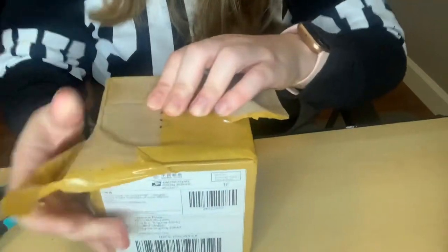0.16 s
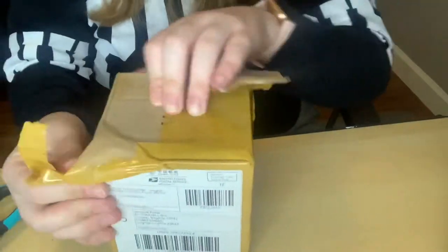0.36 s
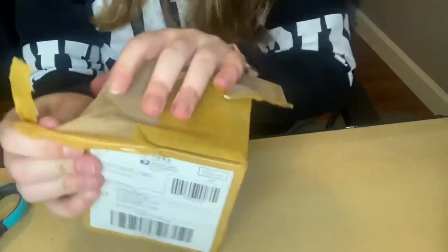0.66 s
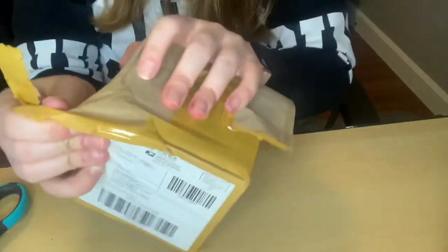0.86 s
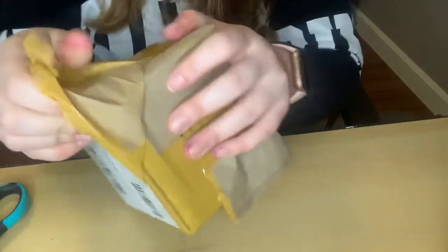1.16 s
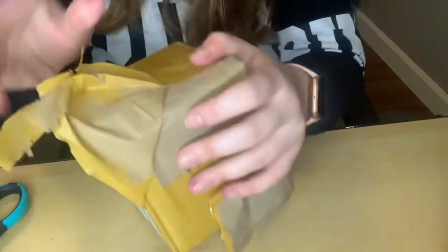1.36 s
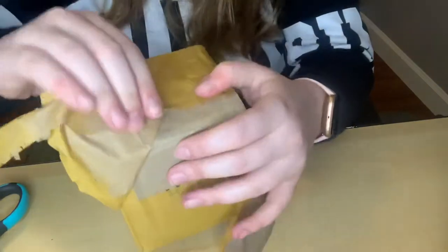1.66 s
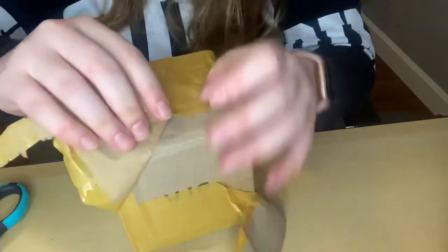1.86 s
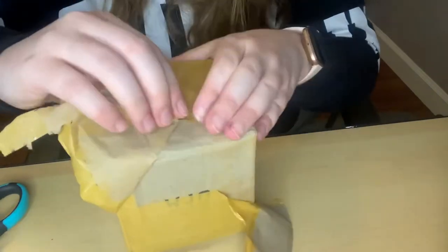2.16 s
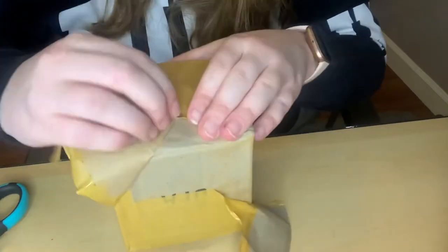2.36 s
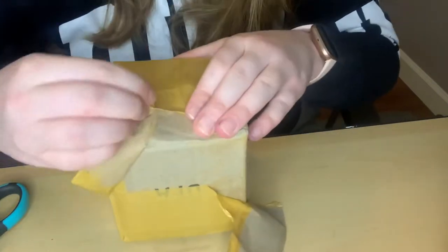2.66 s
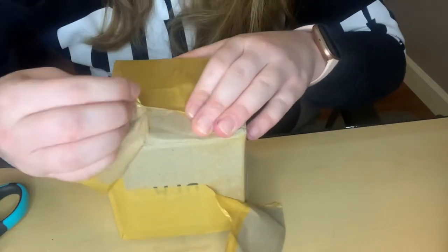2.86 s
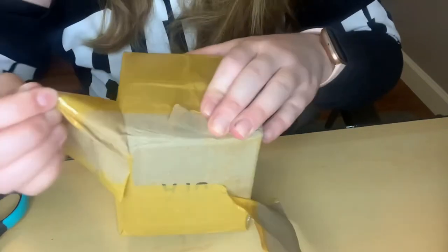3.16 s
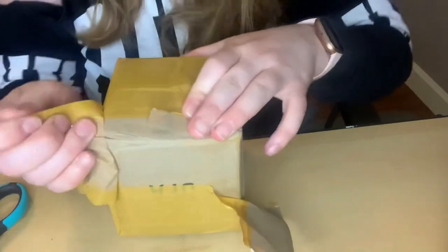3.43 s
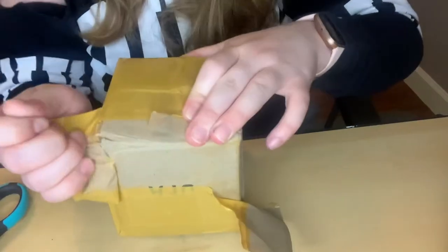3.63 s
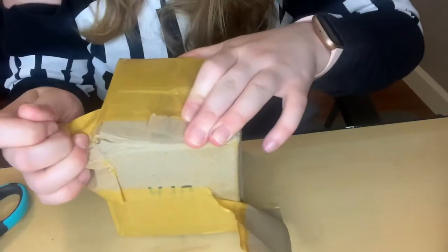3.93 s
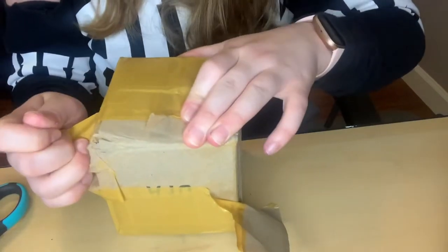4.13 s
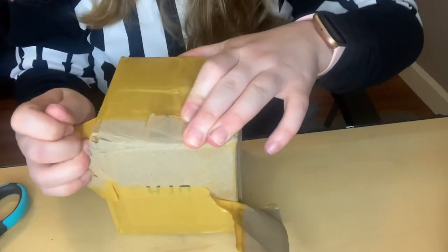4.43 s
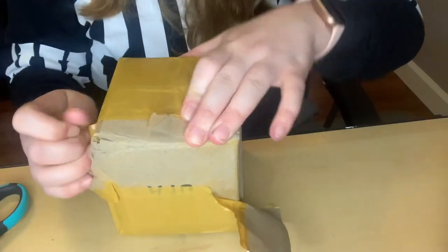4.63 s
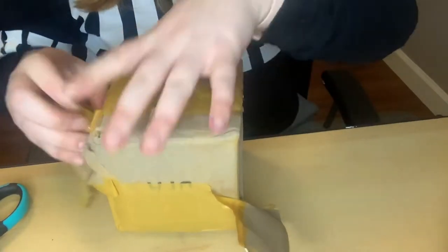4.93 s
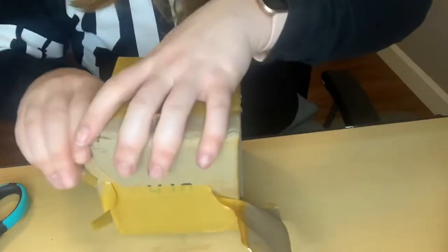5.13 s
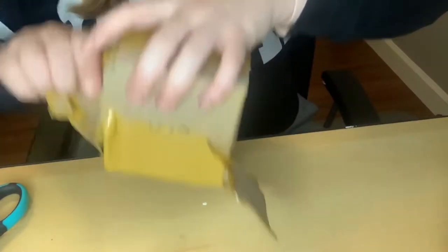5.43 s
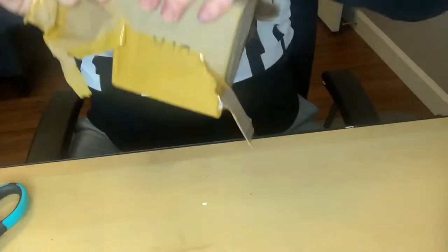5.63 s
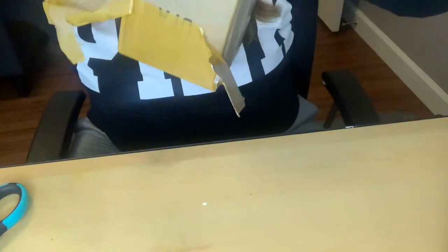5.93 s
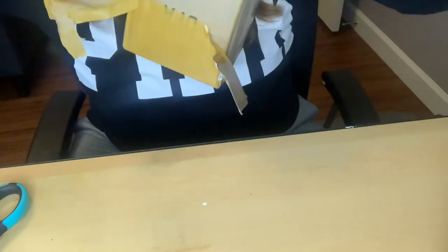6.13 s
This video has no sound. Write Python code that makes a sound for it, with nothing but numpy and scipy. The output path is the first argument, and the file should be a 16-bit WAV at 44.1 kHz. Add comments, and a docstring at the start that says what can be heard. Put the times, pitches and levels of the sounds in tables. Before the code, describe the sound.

A small cardboard parcel is unwrapped on a desk, close to a stereo microphone in a quiet little room. From the start, brown paper crinkles unevenly with crisp snaps and short rips of packing tape, while the box rubs and bumps dully on the desk. The hands pause briefly around 1.4 seconds. From about 2.3 seconds the box is pressed down and tape is picked at, peeling with a thin hiss and small cracks. At 2.9 seconds a hard yank rips and twangs the strip with a thud. A cluster of rips and snaps comes at 3.6 seconds, and a loud snap with a bump at 4.2. Lighter crackling, peeling and nudges continue. After 5.6 seconds the box is lifted away and knocks hollowly with loud, sharp cracks at about 5.7, 5.95 and 6.2 seconds, with a little more room sound.

```python
"""A small cardboard parcel is unwrapped on a desk in a small room, close to a stereo microphone.
From the start the brown paper crinkles as hard as the hands work; packing tape rips in short runs and
the taut wrapping snaps and buckles (bending waves: treble first, bass later) while the box is shoved
and bumps the desk. Midway a hand presses the box down to pick at the tape, then a yank twangs the strip.
Near the end the box is lifted away and knocks hollowly, and more of the room reaches the microphone."""
import sys
import numpy as np
from scipy import signal
from scipy.fft import rfft, irfft
from scipy.io import wavfile
from scipy.ndimage import uniform_filter1d

SR = 44100
rng = np.random.default_rng(int(sys.argv[2]) if len(sys.argv) > 2 else 0)


def file_out(sig):
    """Save sig as 16-bit WAV at sys.argv[1]."""
    # one column per channel
    cols = np.atleast_2d(sig).T
    # limit, then scale
    lim = np.clip(cols, -1, 1)
    pcm = np.round(lim * 32767).astype(np.int16)
    wavfile.write(sys.argv[1], SR, pcm)


N = 277389
TIME = np.arange(N) / SR

# How hard the hands work the wrapping. Each row: time in seconds, effort in dB.
EFFORT = [(0.0, -36.5), (0.4, -39), (0.77, -48.5), (1.14, -39), (1.33, -69), (1.54, -33), (1.7, -48.5),
          (2.08, -65.5), (2.26, -50), (2.42, -46), (3.12, -40.5), (3.65, -50), (3.82, -53.5), (3.96, -40.5),
          (4.17, -35.5), (4.61, -37), (4.77, -40), (4.97, -62), (5.2, -41.5), (5.34, -52), (5.69, -37),
          (5.99, -30), (6.17, -38), (6.29, -45)]
# The hands pause. Each row: start and end in seconds, share of their movement that stops.
RESTS = [(1.298, 1.55, 0.84), (3.44, 3.457, 1), (4.463, 4.508, 1), (5.048, 5.15, 0.9), (5.716, 5.912, 0.59),
         (6.0, 6.135, 0.1)]
# The box is shoved or turned. Each row: start and end in seconds, rubbing and rocking levels in dB.
SHOVES = [(0.201, 0.283, -44, -63), (0.357, 0.566, -55, -52), (0.857, 0.878, -50.5, -56),
          (1.214, 1.256, -48.5, -47.5), (1.525, 1.635, -44, -45.5), (1.973, 2.026, -46, -49),
          (2.381, 2.484, -46.5, -66), (2.934, 2.966, -33.5, -35.5), (3.04, 3.242, -55.5, -58),
          (3.343, 3.366, -63, -44), (3.7, 3.78, -68, -56), (4.22, 4.254, -56, -40),
          (4.347, 4.471, -55.5, -75), (4.655, 4.777, -50.5, -65), (4.91, 4.955, -48.5, -42.5),
          (5.05, 5.23, -59.5, -51.5)]
# Tape creeps off the card with a thin hiss. Each row: start and end in seconds, level in dB.
PEELS = [(2.37, 2.64, -40.5), (3.54, 3.59, -36), (4.0, 4.45, -52), (4.63, 4.73, -43)]
# Runs of ripping tape. Each row: start and end in seconds, rasp pitch in Hz, crack level in dB,
# box wall against the crack in dB.
RIPS = [(0.034, 0.079, 4170, -39, -3.5), (0.201, 0.268, 4500, -40.5, -52),
        (1.231, 1.259, 3000, -47.5, -7.5), (2.381, 2.395, 5500, -33.5, -5), (2.44, 2.45, 5500, -38.5, 5.5),
        (2.594, 2.628, 4500, -35.5, -10.5), (2.737, 2.797, 3600, -40.5, -7), (2.914, 2.926, 3300, -40, -29),
        (2.923, 2.983, 940, -33.5, -7.5), (2.95, 2.985, 4900, -31.5, -21), (3.311, 3.318, 2420, -36.5, -7),
        (3.55, 3.616, 2600, -37, -17.5), (3.569, 3.577, 2100, -34, -10), (3.629, 3.688, 2500, -50.5, -17),
        (4.172, 4.202, 4200, -36.5, -13), (4.655, 4.725, 3900, -38.5, -29), (4.871, 4.929, 3300, -42, -8),
        (5.252, 5.328, 5550, -40, -17), (5.686, 5.7, 6500, -43, -21), (5.938, 5.969, 4530, -28, -19),
        (6.171, 6.186, 4800, -31, -18), (6.198, 6.218, 3970, -24, -9)]
# Snaps of tape and paper. Each row: time in seconds, crease pitch in Hz, crack level in dB,
# then box wall and tape film, each against the crack in dB.
SNAPS = [(0.036, 2130, -29, -13, -4), (0.0531, 8400, -31.5, -0.5, 17), (0.221, 5570, -56, 23, 22),
         (0.2699, 1340, -35.5, -2, -2), (0.3116, 3960, -25.5, -28, -0.5), (0.3808, 4480, -38.5, -11, -10),
         (0.4214, 4600, -28, -26, -6), (0.461, 5340, -25.5, -9.5, -1), (0.523, 7350, -31.5, -40, 4),
         (0.565, 4560, -28, -17.5, 0), (0.627, 1050, -56, 6, -12), (0.6489, 5840, -40.5, -4.5, -13),
         (0.6807, 4020, -40, -20, -7), (0.721, 5200, -42, -24, -6), (0.73, 2100, -29, -20, -3.5),
         (0.8027, 1890, -36, -12, -7), (0.847, 1680, -40, -0.5, -4), (0.926, 3880, -37.5, -33, 4),
         (0.9557, 2820, -37.5, -33, -3), (0.981, 3050, -51, 1, 2), (0.9985, 3510, -22.5, -20, -16),
         (1.015, 4200, -46, -17, 2), (1.038, 3500, -54, -18, 0), (1.091, 3900, -44, -24, -6),
         (1.1046, 3830, -24, -26, -3), (1.114, 2320, -37.5, -12.5, -14), (1.154, 5240, -41, -23, 3),
         (1.18, 3270, -44, -9, -9), (1.195, 3320, -43, -5, -1), (1.2482, 2500, -24.5, -17.5, -3.5),
         (1.2494, 1860, -30, -14.5, -9), (1.265, 3550, -33, -15, 4), (1.429, 6400, -48, -30, -10),
         (1.533, 1220, -45.5, -29, -38), (1.566, 3640, -31.5, -30, -6), (1.5766, 3700, -31, -35, -7),
         (1.6564, 1630, -38, -8, 2), (1.7793, 3600, -39, -6.5, -9), (1.8012, 3380, -31, -19, 3),
         (1.837, 1830, -33, -4, -24), (1.87, 5960, -38, -13, 3.5), (1.9593, 1320, -69, 29.5, -3),
         (2.0139, 3930, -30.5, -14, -4.5), (2.017, 3970, -33.5, -10, -12), (2.1714, 2650, -47, -15, -23),
         (2.231, 3700, -23.5, -36, -4.5), (2.2429, 4640, -25.5, -3, 8.5), (2.3616, 6700, -46.5, -13, 19),
         (2.3854, 5860, -31, 6.5, 19), (2.4423, 6700, -31, 6, 18.5), (2.5543, 7100, -46, -27, 19),
         (2.598, 3780, -26, 0.5, 13.5), (2.609, 6240, -24, -1.5, 1.5), (2.7332, 1300, -24, -3, 3.5),
         (2.7714, 3480, -25.5, -21, -8), (2.787, 7400, -29, -23, 11), (2.9239, 3260, -17.5, -11.5, -1.5),
         (3.1074, 1700, -34.5, -16, 1.5), (3.196, 1900, -34, -11.5, 1), (3.209, 2850, -35.5, -6, -8),
         (3.2815, 3900, -36.5, -18, 5), (3.316, 2920, -31, -5.5, -3), (3.331, 1820, -32.5, -7, -5),
         (3.448, 5000, -40.5, -21, 3), (3.477, 6200, -50, -1, 10), (3.5007, 7000, -40, -22, 1),
         (3.5345, 3300, -24.5, -25, -1.5), (3.557, 3000, -27, -18, -12), (3.567, 2970, -18, -14.5, -2.5),
         (3.574, 2950, -24.5, -10.5, -3), (3.598, 2800, -18.5, -24, -18), (3.611, 3300, -29, -18, -19),
         (3.679, 3400, -35.5, -17, -3), (3.664, 3000, -34.5, -18, -3), (3.773, 1090, -47.5, -9, 2),
         (3.86, 5700, -49, -18, 10), (3.973, 930, -57, 9, -15), (4.0505, 3420, -38, -29, -2),
         (4.0153, 7150, -27, -20.5, 1), (4.0784, 4100, -32.5, -43, 8.5), (4.1875, 4320, -15, -12, -7),
         (4.1899, 1290, -15.5, -15, 1), (4.2056, 1350, -30.5, -3.5, -1), (4.274, 4800, -35.5, -30, 3),
         (4.318, 5450, -31, -31, 9.5), (4.4207, 3800, -34, -15.5, -14.5), (4.538, 3160, -31, -39, -3),
         (4.5655, 2980, -26.5, -17.5, -9), (4.581, 2980, -26.5, -19, 1), (4.6451, 3020, -38, -22, 4),
         (4.7, 3630, -27, -12, -17), (4.692, 4900, -27, -28, -1), (4.7138, 6750, -25.5, -13, 0),
         (4.852, 3260, -32, -18, -7), (4.8739, 3050, -24, -16.5, -0.5), (5.0678, 1040, -52, 25, -6),
         (5.164, 1400, -43.5, -10, -13), (5.179, 4130, -35, -22, -24), (5.1909, 4400, -30, -15.5, -2.5),
         (5.2656, 4320, -33, 6.5, 19.5), (5.2897, 2130, -30, 3, 7.5), (5.321, 6100, -28, -28, 2),
         (5.3448, 5700, -27, -31, 1), (5.4258, 2940, -30.5, -21, 0), (5.4642, 5240, -29, -25, -7),
         (5.4852, 6000, -30.5, -19.5, 9), (5.521, 6200, -46, -0.5, 20), (5.639, 3200, -39, -17, -19),
         (5.6542, 3460, -37.5, -14, -14), (5.858, 6200, -48.5, -34, 12.5), (5.9, 4760, -41.5, -14, 0),
         (6.1327, 4060, -40.5, -32, 7), (5.6839, 7400, -15.5, -15, 2.5), (5.9463, 4570, -19, -11, -7),
         (5.9481, 4500, -15, -10, -3.5), (6.1587, 6300, -33, -23, 14), (6.168, 4330, -22, -19, 7.5),
         (6.1736, 3300, -22, -6.5, 3), (6.1953, 2610, -11.5, -11, -8), (6.2135, 4800, -11.5, -9, -26)]
# The box hits the desk or a hand nudges it. Each row: time in seconds, level in dB, pitch in Hz.
THUDS = [(0.055, -33, 217), (0.186, -47, 85), (0.222, -48, 330), (0.23, -46, 125), (0.408, -37, 180),
         (0.563, -50, 70), (0.846, -39, 298), (0.864, -62, 85), (1.244, -43.5, 108), (1.318, -53, 61.4),
         (1.56, -47, 180), (1.958, -54, 300), (2.245, -42, 150), (2.396, -42, 137), (2.445, -44, 138),
         (2.739, -36.5, 150), (2.9232, -17.5, 390), (2.945, -32, 100), (3.193, -46, 114),
         (3.336, -29.5, 207), (3.347, -38, 139), (3.5355, -30.5, 496), (3.723, -51, 224), (3.915, -51, 163),
         (4.1873, -19.5, 290), (4.204, -36.5, 132), (4.676, -44, 245), (4.901, -43, 248),
         (5.068, -29.5, 283), (5.289, -28, 260)]
# The wall of the lifted box pops in and out. Each row: time in seconds, level in dB.
KNOCKS = [(5.6853, -18.5), (5.9488, -10), (6.1742, -26), (6.1954, -15), (6.2148, -11.5)]

# The parcel's four voices are box wall, paper, crack and tape film: their centres and band edges in Hz.
VOICE_HZ = [380, 1300, 4200, 12000]
VOICE_EDGES_HZ = [150, 700, 2200, 7500, 16000]
# Tone of each source from close by. Each row: frequency in Hz, relative level in dB.
CRINKLE_TONE = [(500, -29), (1500, -2), (3300, 3.5), (5200, -3), (6500, 3), (9000, -11), (16000, -5)]
RUB_TONE = [(100, -3), (250, 3), (430, 5), (750, -1), (1200, -3.5), (1800, -3), (3000, -22), (8000, -105)]
HISS_TONE = [(3000, -74), (7000, -45), (10000, 54), (14500, 26), (16000, 34)]
ROCKING_TONE = [(20, -37), (40, -5.5), (60, 3.5), (110, -4.5), (170, 4), (260, -1), (600, -12.5),
                (2000, -67)]
AIR_TONE = [(20, -19), (60, 7.5), (300, 0.5), (900, -12), (6200, -27), (16000, -31)]
FLUTTER_TONE = [(5000, -0.5), (12000, 1)]
HOLLOW_BOX_TONE = [(100, -15), (200, -6.5), (290, -1), (400, -0.5), (540, 2.5), (750, -4), (1100, 0)]
# Resonances of the taut tape and of the box when pressed down. Each row: pitch and width in Hz, gain in dB.
STRIP_MODES = [(1710, 115, 5.5), (3120, 87, 8)]
PRESSED_BOX_MODES = [(89, 43, -15), (180, 53, -10.5), (285, 30, 4.5), (400, 41, -7.5), (520, 55, 8.5),
                     (638, 25, 7.5), (827, 28, 2.5), (1330, 190, 9.5), (1650, 120, 4), (1860, 64, 6.5),
                     (2330, 170, -1.5)]

# Modes of desk and room. Each row: pitch in Hz, gain in dB, seconds to fall by 60 dB.
HUM_MODES = [(139, -54, 0.38), (446, -61.5, 0.24), (555, -70, 0.27)]
# Decay of the room. Each row: frequency in Hz, seconds to fall by 60 dB.
ROOM_T60 = [(100, 0.6), (300, 0.2258), (1000, 0.29), (4500, 0.3145), (14000, 0.3)]
# Tone of the reflections. Each row: frequency in Hz, relative level in dB.
ROOM_TONE = [(60, -16), (140, 7), (280, -4.5), (450, 3), (800, 7), (1600, 6), (4500, 5), (9000, 1),
             (16000, 1)]
# More room is heard as the parcel moves off the microphone. Each row: time in seconds, room feed in dB.
ROOM_FEED = [(0, -14), (2.4, -12), (4.2, -14.5), (5.4, -11.5), (5.7, -6), (5.95, -8.5), (6.29, -14)]
# The right microphone port hears less of the box. Each row: frequency in Hz, gain in dB.
PORT_SHADE = [(90, 1), (340, -4), (700, 0.5)]
# The right port against the left. Each row: frequency in Hz, phase lag in radians.
PORT_LAG = [(100, 0), (430, -0.27), (1500, 0), (2200, -0.8), (4900, -0.3), (6300, 1.07), (7400, 2.4),
            (10300, 3.6), (12600, 6), (16000, 6.7)]

PRESSED_S, LIFTED_S = (2.2, 2.8), 5.6  # when the box is held down, and when it leaves the desk


def undb(db):
    """Decibels to gain."""
    return 10 ** (np.asarray(db) / 20)


def unit(x):
    """Scale to rms 1."""
    return x / np.sqrt(np.mean(x ** 2) + 1e-20)


def over_hz(points, size):
    """Join (Hz, value) points over the bins of a transform, on a log axis."""
    hz, value = np.transpose(points)
    return np.interp(np.log(np.fft.rfftfreq(size, 1 / SR) + 1), np.log(hz), value)


def colour(x, tone):
    """Give a sound a tone, at rms 1."""
    return unit(irfft(rfft(x) * undb(over_hz(tone, len(x))), len(x)))


def resonances(rows, size):
    """Gain in dB, over the bins of a transform, of (Hz, width Hz, dB) peaks and dips."""
    hz = np.fft.rfftfreq(size, 1 / SR)
    return sum(db / (1 + ((hz - centre) / width) ** 2) for centre, width, db in rows)


def causal(db):
    """The response with this gain that starts at once and then rings out."""
    cepstrum = irfft(np.log(undb(db)))
    half = len(cepstrum) // 2
    return np.exp(rfft(np.r_[cepstrum[0], 2 * cepstrum[1:half]], len(cepstrum)))


def add(track, at_s, sound):
    """Mix a stereo sound in at a time."""
    start = max(int(at_s * SR), 0)
    part = sound[:, :max(N - start, 0)]
    track[:, start:start + part.shape[1]] += part


def crackle(size, rate, spread_db):
    """Random tiny clicks, rate a second, most weak and a few strong."""
    hit = rng.random(size) < rate / SR
    strength = undb(spread_db * np.minimum(rng.exponential(1, size), 4))
    return unit(hit * strength * rng.choice([-1, 1], size))


def bending(size, lag_ms, low_hz):
    """Waves in card: the delay (lag_ms at 1 kHz) goes as 1 / sqrt(f), and deep bass hardly radiates."""
    hz = np.fft.rfftfreq(size, 1 / SR)
    s = 1j * hz / low_hz
    return np.exp(-4j * np.pi * lag_ms * np.sqrt(hz / 1000)) * s * s / (s * s + s + 1)


def at_mic(sound, scatter_db=-7, decay_s=0.00081, size=256):
    """Desk and hands scatter a sound, so it reaches the two microphone ports a little differently."""
    scatter = unit(rng.standard_normal(size) * np.exp(-TIME[:size] / decay_s)) / np.sqrt(size)
    scatter = signal.lfilter(*signal.butter(2, [200, 8000], "band", fs=SR), scatter)
    side = undb(scatter_db) * signal.fftconvolve(sound, scatter)[:len(sound)]
    return np.array([sound + side, sound - side])


def stroke(start, end, attack_s=0.0085, release_s=0.021):
    """One movement of the hands, 0-1: it swells, holds and dies away."""
    return np.exp(np.minimum(TIME - start, 0) / attack_s - np.maximum(TIME - end, 0) / release_s)


def strokes(rows):
    """Gain of a series of (start, end, dB) movements."""
    return sum(undb(db) * stroke(start, end) for start, end, db in rows)


def effort(follow, usual_db=-45.5):
    """Gain that follows the hands by this many dB per dB; 1 at the usual effort, less in a pause."""
    resting = sum(share * stroke(start, end) for start, end, share in RESTS)
    effort_db = np.interp(TIME, *np.transpose(EFFORT)) - usual_db
    return np.clip(1 - resting, 0.02, 1) * undb(follow * effort_db)


def stirring(settle_s=0.018):
    """Gain of the loosened wrapping's movement: every rip feeds it, then it settles."""
    power = sum(undb(db) ** 2 * ((TIME >= start) & (TIME < end)) for start, end, _, db, _ in RIPS)
    keep = np.exp(-1 / (settle_s * SR))
    return np.sqrt(signal.lfilter([1 - keep], [1, -keep], power + 1e-18))


def catch_and_slip(rate=28, depth_db=2.2):
    """Gain of paper that catches and slips: random levels, each held briefly."""
    hold = int(SR / rate)
    level = np.repeat(rng.standard_normal(N // hold + 1), hold)[:N]
    return unit(undb(depth_db * uniform_filter1d(level, hold // 3)))


def creases(low_hz, high_hz, rate, q=4.3, count=10):
    """Many small creases, each ticking at random with its own short ring."""
    hz, spectrum = np.fft.rfftfreq(N, 1 / SR), 0
    for centre in np.geomspace(low_hz, high_hz, count):
        s = 1j * hz / centre
        spectrum += rfft(crackle(N, rate / count, spread_db=3.3)) * s / (s * s + s / q + 1)
    return unit(irfft(spectrum * bending(N, lag_ms=0.833, low_hz=151), N))


def handling(crinkle_db=-54, rub_db=-58, hiss_db=-59):
    """Paper crinkles, fingers and box rub, and tape hisses as it creeps off the card."""
    catching, shoved = catch_and_slip(), strokes(np.array(SHOVES)[:, :3])
    disturbed = undb(-9) * (stirring() + shoved)
    crinkle = np.hypot(undb(crinkle_db) * effort(follow=0.59) * catching, disturbed)
    rub = np.hypot(undb(rub_db) * effort(follow=0.29) * catching, undb(-2) * shoved)
    hiss = np.hypot(undb(hiss_db) * effort(follow=0.43), undb(-1) * strokes(PEELS))
    ticks = creases(low_hz=1280, high_hz=12400, rate=120)
    scuffs = creases(low_hz=261, high_hz=2330, rate=400)
    friction = crackle(N, rate=9900, spread_db=1.5)
    return (at_mic(crinkle * colour(ticks + 1.33 * friction, CRINKLE_TONE))
            + at_mic(rub * colour(scuffs + 0.67 * friction, RUB_TONE))
            + at_mic(hiss * colour(ticks + 0.8 * friction, HISS_TONE)))


def rocking(held_db=-73, shove_db=-7, recoil_db=-15, sway_db=-5):
    """The box rocks in dull little nudges when held, shoved or tugged by a rip."""
    shoved = strokes([(start, end, db) for start, end, _, db in SHOVES])
    recoil = stirring() * (TIME < LIFTED_S)
    held = undb(held_db) * effort(follow=0.12)
    push = np.hypot(held, undb(shove_db) * shoved + undb(recoil_db) * recoil)
    nudges, sway = (push * colour(crackle(N, rate=110, spread_db=3), ROCKING_TONE) for _ in range(2))
    return at_mic(nudges) + undb(sway_db) * np.array([sway, -sway])


def room_air(level_db=-68):
    """The still room: faint, low, steady noise."""
    return at_mic(undb(level_db) * colour(rng.standard_normal(N), AIR_TONE))


def pressed(at_s):
    """Whether a hand is pressing the box onto the desk."""
    return PRESSED_S[0] < at_s < PRESSED_S[1]


def voice_levels(at_s, crack_db, wall_db, film_db, crease_hz):
    """Levels in dB of box wall, paper, crack and film for one release of tension."""
    wide_crease = np.exp(-np.log2(crease_hz / VOICE_HZ[1]) ** 2)  # rings near the paper's own pitch
    paper_db = 0.5 + 0.56 * wall_db + 6 * wide_crease
    paper_db -= 0.25 * max(crack_db + 28, 0)  # in a loud snap the paper falls behind the crack
    if at_s > LIFTED_S:  # once lifted, the box wall is heard in the hollow knocks; snaps sound thinner
        wall_db, paper_db = wall_db - 7, paper_db - 4
    return crack_db + np.array([wall_db, paper_db, 0, film_db])


def voiced(spectrum, voice_db, seconds, trim_db=-1):
    """Share a burst among the four voices, aiming at voice_db + trim_db as rms over the given time."""
    size = 2 * (len(spectrum) - 1)
    bins = (np.array(VOICE_EDGES_HZ) * size / SR).astype(int)
    for _ in range(2):
        energy = np.add.reduceat(abs(spectrum) ** 2, bins)[:-1] * 2 / size
        lift_db = voice_db + trim_db - 10 * np.log10(energy / (seconds * SR) + 1e-20)
        spectrum = spectrum * causal(over_hz(np.c_[VOICE_HZ, lift_db], size))
    return irfft(spectrum)


def rips(usual_rate=750, usual_db=-39, film_db=-1, rasp_width=0.77, rasp_db=5, edge_s=0.012, size=8192):
    """Glue strands and fibres give way in an uneven run of clicks; a harder pull runs them together."""
    out, t = np.zeros((2, N)), TIME[:size]
    path = bending(size, lag_ms=0.879, low_hz=170)
    for start, end, rasp_hz, crack_db, wall_db in RIPS:
        length = max(end - start, edge_s)
        pull = np.clip(np.minimum(t, length - t) / edge_s + .5, 0, 1)
        clicks = pull * crackle(size, usual_rate * undb(crack_db - usual_db), spread_db=1.5)
        rasp = (rasp_hz, rasp_width * rasp_hz, rasp_db)
        modes = PRESSED_BOX_MODES if pressed(start) else STRIP_MODES
        ring = causal(resonances([rasp, *modes], size))
        voice_db = voice_levels(start, crack_db, wall_db, film_db, rasp_hz)
        add(out, start, at_mic(voiced(rfft(clicks) * ring * path, voice_db, length)))
    return out


def small_snaps(crack_db=-48, crease_hz=3600, wall_db=-17, film_db=-3, count=18):
    """Rows like SNAPS: lesser creases give way at random until the lift, louder under busier hands."""
    times = (np.arange(count) + rng.random(count)) * LIFTED_S / count
    levels_db = crack_db + 20 * np.log10(np.interp(times, TIME, effort(follow=0.55)))
    variations = rng.standard_normal((count, 4))
    return [(at_s, crease_hz * 2 ** (0.8 * pitch), db + 2.5 * size, wall_db + 4 * wall, film_db + 4 * film)
            for at_s, db, (pitch, size, wall, film) in zip(times, levels_db, variations)]


def crease_ring(crease_hz, film_db, size, ring_db=6.5, above_db=-5):
    """Gain in dB of a crease: it rings at its own pitch and radiates less above it."""
    hz = np.fft.rfftfreq(size, 1 / SR)
    bare_db = np.clip(-0.45 * film_db, 0, 6)  # bare paper rings louder and broader than taped
    width_hz = 0.11 * crease_hz * undb(0.5 * bare_db)
    peak_db = resonances([(crease_hz, width_hz, ring_db + bare_db)], size)
    return peak_db + above_db * np.clip(2 * (hz / crease_hz - 1), 0, 1)


def snaps(creak=0.035, creak_s=0.003, flutter=0.17, flutter_s=0.002, big_db=-20, lead_s=0.00022):
    """A crease creaks, flips with one sharp click and flutters; this spreads through the box wall."""
    out, size, flip = np.zeros((2, N)), 4096, 256
    t = (np.arange(size) - flip) / SR
    for at_s, crease_hz, crack_db, wall_db, film_db in SNAPS + small_snaps():
        voice_db = voice_levels(at_s, crack_db, wall_db, film_db, crease_hz)
        age = abs(t) / undb(0.037 * (max(voice_db) - big_db))  # a big crease moves for longer
        shiver = np.where(t < 0, creak * np.exp(-age / creak_s), flutter * np.exp(-age / flutter_s))
        click = shiver * colour(rng.standard_normal(size), FLUTTER_TONE)
        click[flip] = 1
        box_db = resonances(PRESSED_BOX_MODES, size) if pressed(at_s) else over_hz(HOLLOW_BOX_TONE, size)
        ring = causal(crease_ring(crease_hz, film_db, size) + box_db)
        path = bending(size, lag_ms=np.exp(0.1945 * rng.standard_normal()), low_hz=210)
        snap = voiced(rfft(click) * ring * path, voice_db, seconds=0.0022)
        add(out, at_s + t[0] - lead_s, at_mic(snap))
    return out


def thump(hz, q, lag_ms, size=8192):
    """A few heavily damped swings of the card around one pitch; peak 1."""
    s = 1j * np.fft.rfftfreq(size, 1 / SR) / hz
    swing = irfft((s / (s * s + s / q + 1)) ** 2 * bending(size, lag_ms, low_hz=30))
    return swing / abs(swing).max()


def thuds():
    """A firm bump of the box on the desk arrives as a falling thud."""
    out = np.zeros((2, N))
    for at_s, level_db, hz in THUDS:
        add(out, at_s, at_mic(undb(level_db) * thump(hz, q=1, lag_ms=1.303)))
    return out


def yank(at_s=2.9228, level_db=-10, rise_s=0.0014):
    """The strip of tape comes taut all at once and twangs for a few milliseconds."""
    out, t = np.zeros((2, N)), TIME[:2048]
    twang = sum(np.sin(2 * np.pi * hz * t) * np.exp(-np.pi * width * t) for hz, width, _ in STRIP_MODES)
    add(out, at_s, at_mic(undb(level_db) * twang * (1 - np.exp(-t / rise_s))))
    return out


def hollow_knocks():
    """The wall of the lifted box pops in and out, at the same hollow pitch each time."""
    out, knock = np.zeros((2, N)), thump(hz=393, q=1.45, lag_ms=0.314)
    for at_s, level_db in KNOCKS:
        add(out, at_s, at_mic(undb(level_db) * knock, scatter_db=-7.5))
    return out


def desk_hum(sound):
    """A few low modes of desk and room ring on after the parcel's sounds."""
    t = TIME[:SR]
    ring = sum(undb(db - 60 * t / t60) * np.sin(2 * np.pi * hz * t) for hz, db, t60 in HUM_MODES)
    return signal.fftconvolve(sound, ring)[:N]


def room_tail(onset_s=0.00012, size=22050):
    """Dense reflections; each octave dies at its own pace."""
    t, octave = TIME[:size], np.log2(np.fft.rfftfreq(size, 1 / SR) + 1)
    noise, tail = rfft(rng.standard_normal(size)), 0
    for centre in range(5, 15):
        t60 = np.interp(centre, octave, over_hz(ROOM_T60, size))
        band = np.maximum(1 - abs(octave - centre), 0) * undb(over_hz(ROOM_TONE, size))
        tail += irfft(noise * band, size) * undb(-60 * t / t60)
    return unit(tail * np.clip(t / onset_s - .5, 0, 1)) / np.sqrt(size)


def reflections(sound):
    """The room answers differently left and right, widest from 2 to 5 kHz."""
    feed = sound * undb(np.interp(TIME, *np.transpose(ROOM_FEED)))
    mid, side = (signal.fftconvolve(feed, room_tail())[:N] for _ in range(2))
    width_db = over_hz([(300, -8), (2000, 1), (5000, 1), (9000, -9)], N)
    side = irfft(rfft(side) * undb(width_db), N)
    return np.array([mid + side, mid - side])


def scene():
    """The parcel close to the microphone, the desk under it and the small room behind."""
    direct = snaps() + rips() + yank() + handling() + rocking() + thuds() + hollow_knocks()
    centre = direct.mean(axis=0)
    return direct + desk_hum(centre) + reflections(centre) + room_air()


def record(dry, drive=0.35, top_hz=15900):
    """The microphone: its right port is shaded and turned in phase; peaks are rounded, the top is cut."""
    right_port = undb(over_hz(PORT_SHADE, N)) * np.exp(-1j * over_hz(PORT_LAG, N))
    right = irfft(rfft(dry[1]) * right_port, N)
    rounded = np.tanh(drive * np.array([dry[0], right])) / drive
    low_pass = signal.ellip(10, .2, 70, top_hz, fs=SR, output="sos")
    return signal.sosfilt(low_pass, rounded)


dry = scene()
out = record(dry)
file_out(out)
```